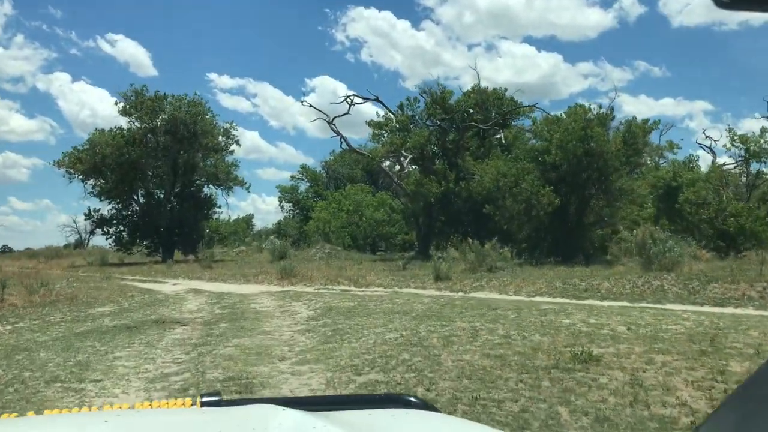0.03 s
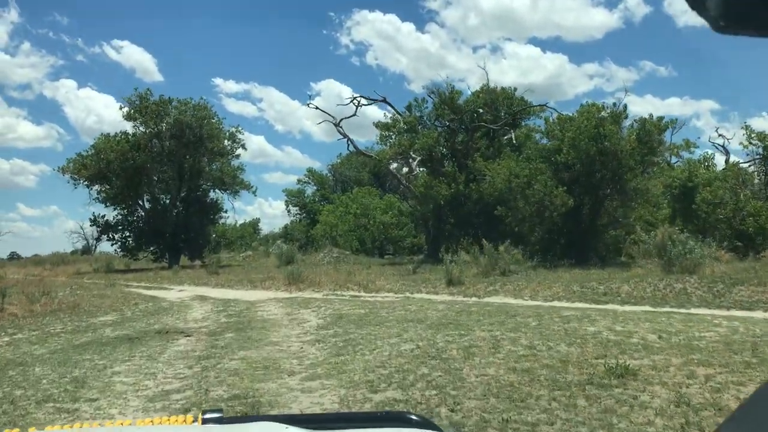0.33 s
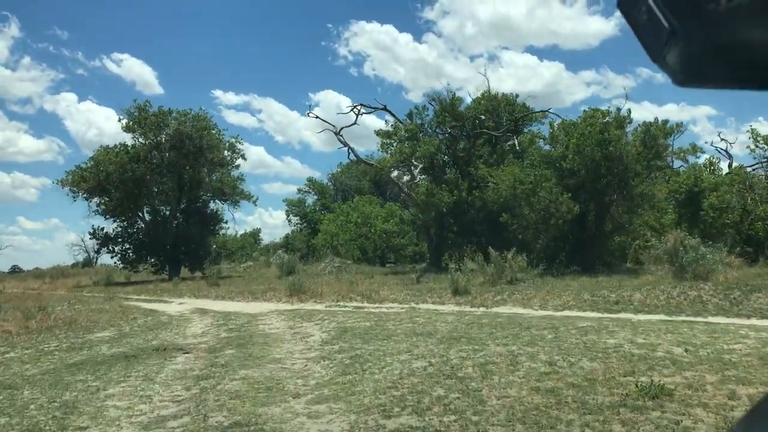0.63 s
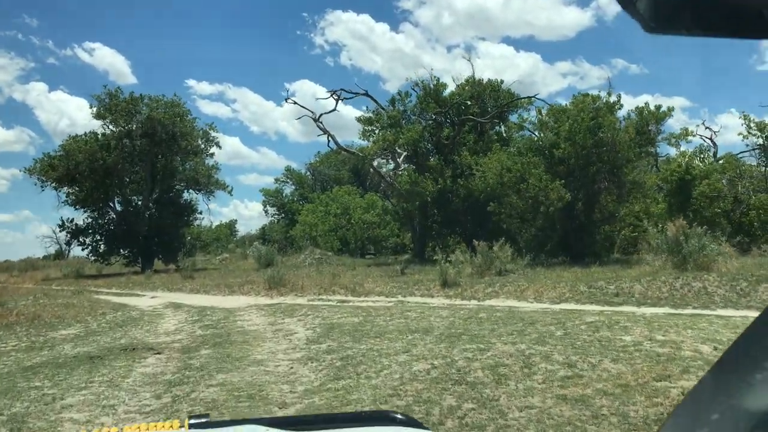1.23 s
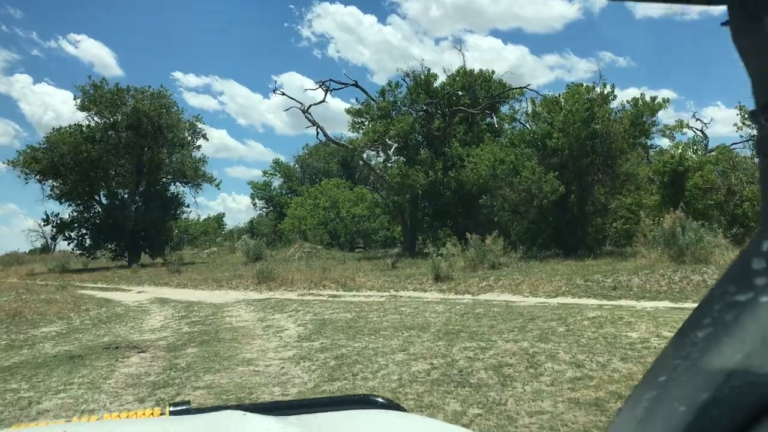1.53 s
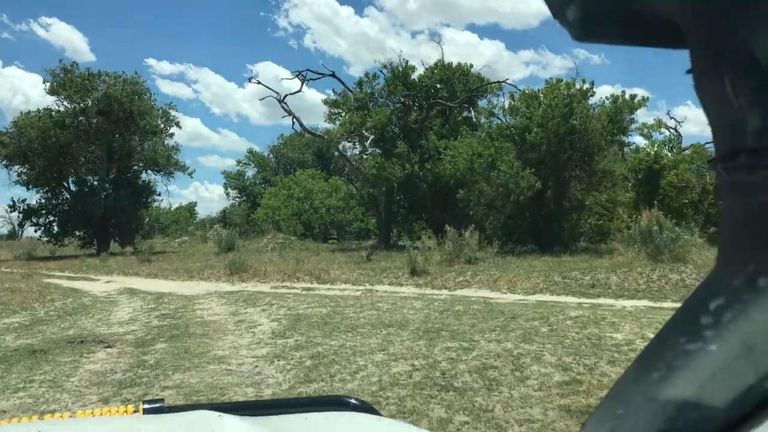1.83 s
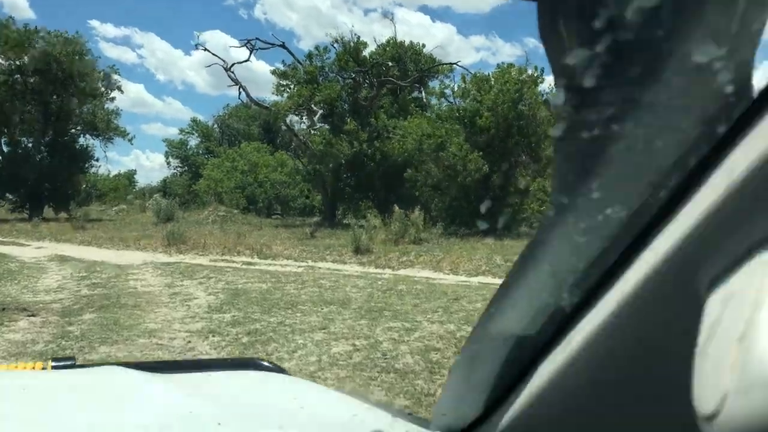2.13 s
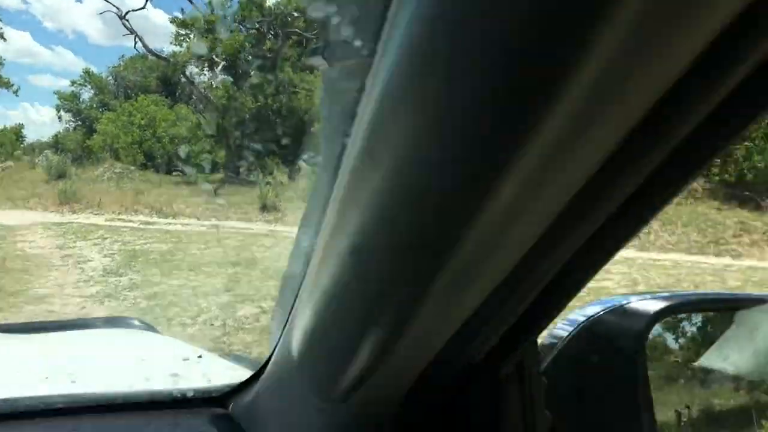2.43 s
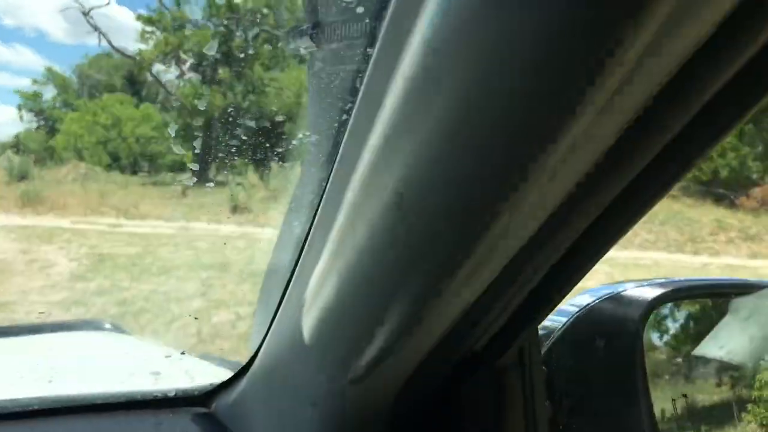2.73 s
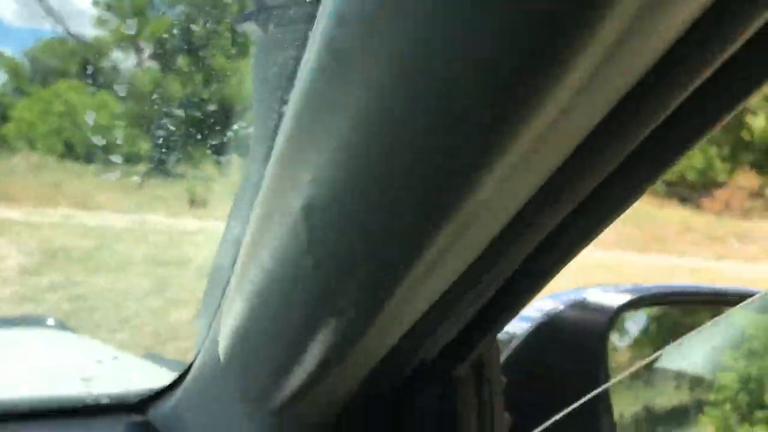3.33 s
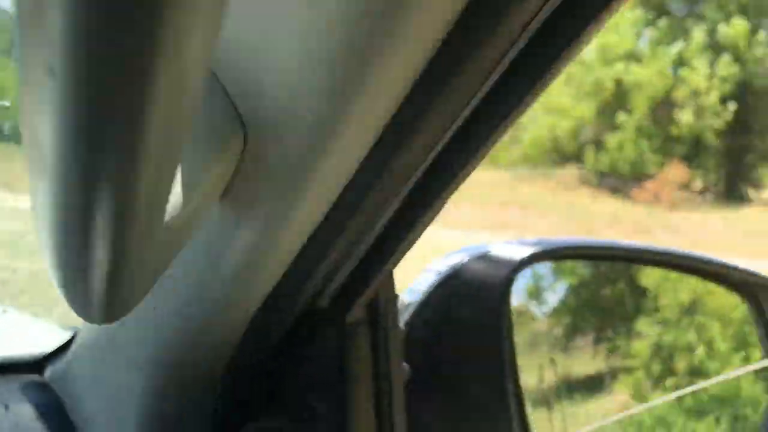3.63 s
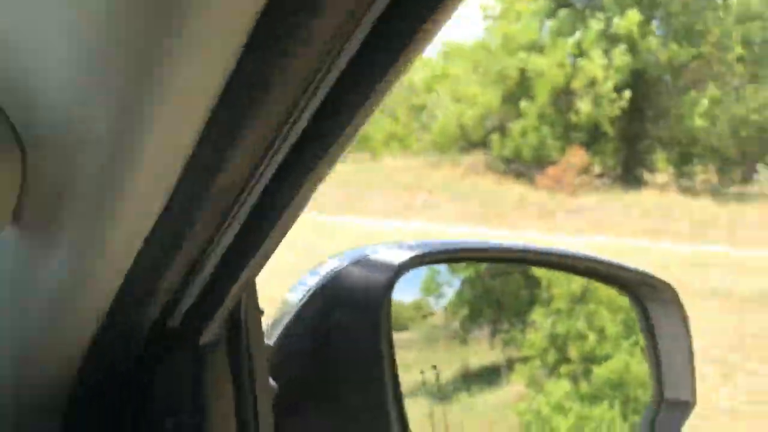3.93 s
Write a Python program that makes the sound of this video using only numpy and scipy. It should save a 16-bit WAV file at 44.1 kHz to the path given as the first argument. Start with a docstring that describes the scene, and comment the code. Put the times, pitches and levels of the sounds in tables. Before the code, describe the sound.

A vehicle's engine rumbles down to idle, then a power window clunks and slides open.

```python
"""Inside an off-road vehicle, the engine runs down to idle while loose plastic trim ticks and squeaks
and the cabin booms. Someone shifts in a seat, clothing brushing it, and bumps the door: a hard fitting
rings, then the panels hum briefly. At three seconds an electric window breaks free of its seal with a
clunk; its motor whirrs and the glass hisses down through the rubber."""
import sys
import numpy as np
from scipy import signal
from scipy.fft import rfft, irfft
from scipy.io import wavfile

SR = 44100
rng = np.random.default_rng(int(sys.argv[2]) if len(sys.argv) > 2 else 0)


def store_pcm(level_fs):
    """Save levels as 16-bit WAV."""
    pcm = np.round(np.clip(level_fs, -1, 1) * 32767).astype(np.int16)
    wavfile.write(sys.argv[1], SR, np.atleast_2d(pcm).T)


N = 176400
T = np.arange(N) / SR

# engine run-down: (time [s], firing rate [Hz], level of each of harmonics 1 to 4 [dB])
ENGINE_RUNDOWN = [(0.0, 59.77, -40.5, -37.5, -37, -55), (0.09, 59.74, -32, -41.5, -39, -50.5),
                  (0.18, 60.06, -55, -37.5, -44.5, -62), (0.47, 57.32, -30, -38.5, -40.5, -54),
                  (0.6, 57.1, -35, -38, -46, -64), (0.68, 54.54, -32, -38, -46.5, -54),
                  (0.75, 52.74, -30.5, -47, -64, -73), (0.87, 49.56, -34.5, -56, -44.5, -60),
                  (0.97, 46.8, -28.5, -36, -41.5, -38.5), (1.11, 43.36, -39.5, -41.5, -43.5, -46.5),
                  (1.22, 40.2, -40, -37, -65, -46), (1.28, 39.76, -34.5, -62, -43.5, -53.5),
                  (1.36, 37.85, -42, -37, -47, -48.5), (1.49, 34.79, -35.5, -37.5, -55, -47),
                  (1.63, 31.06, -45, -49.5, -45, -49.5), (1.89, 26.25, -63, -39.5, -47, -45.5),
                  (2.1, 25.13, -53, -43, -48.5, -62.5), (2.32, 24.56, -54, -60, -41, -55),
                  (2.54, 23.37, -56, -47, -47.5, -55), (2.95, 23.25, -61, -45, -46, -54),
                  (3.27, 23.95, -60, -44, -42.5, -44), (3.5, 24.4, -60, -49, -45.5, -45.5),
                  (3.7, 24.45, -62, -53, -47, -50), (4.0, 24.37, -54, -73, -45, -51.5)]
# cabin response to the higher harmonics: (frequency [Hz], level [dB])
CABIN_RESPONSE = [(90, -56), (120, -58.5), (150, -60.5), (183, -54), (215, -78.5), (300, -68), (360, -84),
                  (450, -74.5), (700, -83.5)]
# fade of the engine and tyre rumble: (time [s], level [dB])
RUMBLE_FADE = [(0, -40), (.45, -41.5), (.75, -44.5), (1.05, -45), (1.3, -46.5), (1.9, -45.5), (2.3, -48.5),
               (2.75, -49.5), (3.4, -49), (4, -55.5)]
# colour of the rumble: (frequency [Hz], gain [dB])
RUMBLE_EQ = [(20, 0.5), (42, 20.5), (90, 7.5), (180, 5.5), (225, -2), (330, -9.5), (450, -12.5), (600, -14),
             (850, -40.5), (1400, -31), (2200, -35), (4000, -39.5), (8000, -55), (15000, -72)]
# panels and cabin air rung by the rumble: (frequency [Hz], width [Hz], level against the rumble [dB])
CABIN_MODES = [(188, 5.3, -9), (290.2, 28, -15), (351.6, 21.7, -18), (634, 105, -22.5), (1160, 145, -28.5),
               (1502, 79, -30), (1855, 10, -37)]
# colour of the faint air bed: (frequency [Hz], gain [dB])
AIR_EQ = [(500, -5), (5000, 5), (9000, 0.5), (10400, -4.5), (12000, 2), (16000, -2)]
# ticks of loose trim: (time [s], level [dB], pitch [Hz])
TRIM_TICKS = [(0.014, -59, 2860), (0.397, -64, 2840), (0.53, -72.5, 8500), (.612, -72, 5980),
              (.688, -68, 3160), (.833, -73, 12980), (0.894, -54.5, 1268), (0.922, -65, 5000),
              (0.989, -66, 6960), (1.019, -59.5, 1280), (1.5417, -56.5, 1470), (1.541, -67, 4180),
              (1.567, -59, 2416), (2.161, -60, 2067), (2.9, -55, 1000), (2.899, -63, 3200),
              (2.897, -62, 6500), (2.943, -65, 3250)]
# squeaks of plastic trim: (time [s], level [dB], pitch [Hz])
TRIM_SQUEAKS = [(0.079, -64.5, 6300), (0.169, -69, 6300), (0.239, -65.5, 6270), (.262, -70, 6200),
                (0.297, -66, 6400), (.314, -69, 6300), (0.328, -61, 6200), (.398, -57.5, 6050),
                (0.417, -62, 6240), (0.99, -57, 2746), (1.19, -66.5, 4500), (1.97, -74, 4600),
                (2.025, -68.5, 4400)]
# deep booms in the cabin: (time [s], level [dB], pitch [Hz])
CABIN_BOOMS = [(0.648, -22, 55.3), (3.049, -27.5, 82.3), (3.103, -24, 61.5), (3.133, -25, 67.8),
               (3.39, -29, 58.03)]
# clothing brushing the seat: (peak time [s], level [dB], half length [s])
SEAT_BRUSHES = [(1.635, -61.5, 0.03), (1.824, -63.5, 0.028), (1.856, -58.5, 0.011), (2.017, -71.5, 0.022),
                (2.234, -65, 0.013), (2.4, -75, 0.088), (2.728, -70, 0.061), (2.871, -71, 0.047)]
# colour of the cloth: (frequency [Hz], gain [dB])
CLOTH_EQ = [(500, -6), (1400, 15.5), (3500, 9.5), (5800, 10.5), (9500, 10.5), (10500, 7.5), (13000, 8.5),
            (16000, 3)]
# knocks of door, latch and glass: (time [s], thud gain [dB], clack [dB], crack [dB], contact decay [s])
DOOR_KNOCKS = [(1.8432, -41, -43, -55, 0.0095), (1.85, -31, -40.5, -49.5, 0.013),
               (1.876, -35.5, -62, -77, 0.0051), (1.906, -49, -53.5, -66, 0.011),
               (3.014, -54, -50, -53, 0.0086), (3.0195, -43, -38, -40.5, 0.0083),
               (3.026, -30.5, -34, -44.5, 0.0076), (3.041, -44, -44, -45, 0.0061),
               (3.052, -40, -40, -38.5, 0.0087), (3.067, -41, -32.5, -39, 0.0073),
               (3.0759, -31.5, -30, -49, 0.013), (3.092, -44, -54, -35.5, 0.011),
               (3.098, -39.5, -50, -35, 0.016), (3.112, -30, -39, -32.5, 0.01),
               (3.12, -37.5, -40.5, -24.5, 0.0061), (3.126, -37.5, -41, -40, 0.0063),
               (3.144, -30.5, -47, -59, 0.014), (3.174, -40.5, -48.5, -57, 0.019),
               (3.392, -45, -48, -56, 0.051)]
# thud of the door panel: (frequency [Hz], gain [dB])
PANEL_MODES = [(80, 7), (110, -1), (138, 9.5), (178, 4.5), (255, 0.5), (304, 0), (385, -11.5), (480, -7.5)]
# clack of the window frame and lifter: (frequency [Hz], width [Hz], gain [dB])
FRAME_MODES = [(333.1, 46, 6.5), (557, 85, 3.5), (702, 108, 1.5), (1090, 204, 0.5), (1455, 147, 2.5),
               (1917.4, 280, -4), (2370, 775, -5.5), (2888, 230, -5)]
# crack of the glass in its seal: (frequency [Hz], width [Hz], gain [dB])
SEATED_GLASS_MODES = [(2800, 1400, 1), (3750, 345, 8.5), (4250, 290, 4.5), (5570, 540, 5),
                      (6770, 1400, -4.5), (8828, 1500, -6.5), (12600, 2700, -14)]
# bumps on a hard door fitting: (time [s], level [dB])
FITTING_BUMPS = [(1.8444, -42.5), (1.853, -48.5)]
# ring of the fitting: (frequency [Hz], gain [dB], time to fall 60 dB [s])
FITTING_RING = [(1040, -16, 0.13), (1363, -2, 0.046), (1780, 0.5, 0.046), (2300, -10.5, 0.062),
                (3505, -11, 0.054), (4294, -0.5, 0.027)]
# spin-up of the window motor: (time [s], speed [turns/s])
MOTOR_SPIN = [(3.02, 105), (3.08, 120), (3.25, 120.7), (3.32, 121.2), (3.42, 120.7), (3.55, 121.3),
              (4, 121.2)]
# tones of the motor: (multiple of the turning rate, level [dB])
MOTOR_HARMONICS = [(1, -54), (2, -63), (3, -69.5), (4, -65), (5, -72), (6, -69.5), (7, -74), (8, -73.5),
                   (12, -72), (30, -62.5)]
# glass rubbing on the seal: (time [s], body level [dB], treble level [dB])
SLIDE_LEVELS = [(3.05, -52, -57), (3.17, -61.5, -59), (3.22, -55.5, -59), (3.35, -55.5, -57),
                (3.42, -51, -57), (3.5, -49.5, -55.5), (3.59, -48, -52), (3.7, -50.5, -55.5),
                (3.82, -48, -55.5), (3.94, -49, -57), (4, -48, -54)]
# colour of the slide's body: (frequency [Hz], gain [dB])
SLIDE_BODY_EQ = [(200, 20.5), (520, 14.5), (800, 10.5), (1450, 9.5), (2150, 7), (2460, 6.5), (2950, 3.5),
                 (3650, 8.5), (4450, 9.5), (4950, 2.5), (6500, 5), (9000, -5), (15000, 2.5)]
# colour of the slide's treble: (frequency [Hz], gain [dB])
SLIDE_TREBLE_EQ = [(2000, 14.5), (5000, 2), (6800, 9), (7600, 9), (8900, 14), (9500, 10.5), (10000, 11.5),
                   (10600, 6), (12000, 9.5), (16000, -4)]
# pane rung by the rubber: (frequency [Hz], width [Hz], level against the slide's body [dB])
PANE_RING = [(2440, 61.6, -27), (3510, 89, -19), (4420, 150, -18), (5420, 99, -16), (6500, 330, -24),
             (8000, 200, -30), (8800, 100, -26)]
# brief rubs on the seal: (peak time [s], level [dB], half length [s], pitch [Hz], width [Hz])
SEAL_RUBS = [(3.555, -56, .05, 2440, 200), (3.87, -56.5, 0.069, 3860, 900)]

CONTACT_RISE_S, PANEL_T60_S = 0.0013, 0.12
MOTOR_ON_S, MOTOR_RISE_S = 3.02, 0.083


def from_db(db):
    """Decibels to gain."""
    return 10 ** (np.asarray(db) / 20)


def rms_one(x):
    """Scale to unit power."""
    return x / np.sqrt(np.mean(x ** 2) + 1e-20)


def in_time(rows):
    """Each column of an automation curve, at every sample."""
    times, *columns = np.transpose(rows)
    return [np.interp(T, times, column) for column in columns]


def at_hz(eq, hz):
    """Read an EQ curve in dB on a log-frequency axis."""
    freqs, db = np.transpose(eq)
    return np.interp(np.log(np.maximum(hz, 1)), np.log(freqs), db)


def drift(rate_hz, size=4410):
    """Smooth random wander of spread 1."""
    freqs = np.arange(size // 2 + 1) * SR / N
    spectrum = rfft(rng.standard_normal(size)) / (1 + (freqs / rate_hz) ** 2)
    return np.interp(np.arange(N) * size / N, np.arange(size), rms_one(irfft(spectrum, size)))


def noise(eq):
    """Noise of the given colour, rms 1."""
    freqs = np.arange(N // 2 + 1) * SR / N
    return rms_one(irfft(rfft(rng.standard_normal(N)) * from_db(at_hz(eq, freqs)), N))


def burst(start, rise_s, decay_s):
    """Fast attack and exponential tail, peak 1."""
    age = np.maximum(T - start, 0)
    shape = (1 - np.exp(-(age / rise_s) ** 2)) * np.exp(-np.minimum(age / decay_s, 60))
    return shape / shape.max()


def swell(peak_s, db, half_s):
    """A rounded rise and fall."""
    return from_db(db) / (1 + ((T - peak_s) / half_s) ** 4)


def rattle(force, modes):
    """A rough contact drives parallel resonances; force 1 gives rms 1."""
    drive = force * rng.standard_normal(N) + 1e-18
    out, power = 0, 0
    for k, (hz, width, db) in enumerate(modes):
        radius, gain = np.exp(-np.pi * width / SR), from_db(db)
        feed = (1 - radius ** 2) / 2
        poles = [1, -2 * radius * np.cos(2 * np.pi * hz / SR), radius ** 2]
        out += (-1) ** k * gain * signal.lfilter([feed, 0, -feed], poles, drive)
        power += feed * gain ** 2
    return out / np.sqrt(power)


def band(force, hz, width_hz):
    """Noise ringing through a single resonance."""
    return rattle(force, [(hz, width_hz, 0)])


def engine():
    """Firing harmonics slide down through the cabin's resonances, over a rumble that throbs with them."""
    firing_hz, *low_db = in_time(ENGINE_RUNDOWN)
    rumble_db, = in_time(RUMBLE_FADE)
    phase = 2 * np.pi * np.cumsum(firing_hz) / SR
    load_db = rumble_db - rumble_db.mean()
    tone = 0
    for k in range(1, 19):
        if k <= len(low_db):
            db = low_db[k - 1]
        else:  # upper harmonics ride the rumble's level and waver by 3 dB
            db = at_hz(CABIN_RESPONSE, k * firing_hz) + load_db + 3 * drift(10.4)
        tone += np.sqrt(2) * from_db(db) * np.cos(k * (phase + rng.normal(0, 0.2)))
    rumble = noise(RUMBLE_EQ) + sum(band(from_db(db), hz, width) for hz, width, db in CABIN_MODES)
    throb = 1 + 0.19 * np.cos(phase)
    return tone + from_db(rumble_db) * rumble * throb


def air():
    """A faint, steady bed of hiss."""
    return from_db(-77.5) * noise(AIR_EQ)


def trim():
    """Loose plastic ticks with a broad resonance and squeaks with a narrow one."""
    ticks = sum(band(from_db(db) * burst(start, rise_s=0.0012, decay_s=0.012), hz, 0.26 * hz)
                for start, db, hz in TRIM_TICKS)
    squeaks = sum(band(from_db(db) * burst(start, CONTACT_RISE_S, decay_s=0.003), hz, 0.07 * hz)
                  for start, db, hz in TRIM_SQUEAKS)
    return ticks + squeaks


def booms():
    """Deep booms in the cabin, a few cycles each, including the low thud of the window's clunk."""
    return sum(from_db(db) * burst(start, rise_s=0.01, decay_s=0.028)
               * np.sin(2 * np.pi * hz * (T - start)) for start, db, hz in CABIN_BOOMS)


def clothing():
    """Cloth brushes the seat in soft, bright swishes."""
    return noise(CLOTH_EQ) * sum(swell(*brush) for brush in SEAT_BRUSHES)


def door():
    """Each knock thumps the panel, rattles the frame and cracks against the glass."""
    thuds, clack, crack = 0, 0, 0
    for start, thud_db, clack_db, crack_db, decay_s in DOOR_KNOCKS:
        contact = burst(start, CONTACT_RISE_S, decay_s)
        clack += from_db(clack_db) * contact
        crack += from_db(crack_db) * contact
        age = np.maximum(T - start, 0)
        panel = sum(from_db(db + rng.normal(0, 2)) * np.sin(2 * np.pi * hz * age)
                    for hz, db in PANEL_MODES)
        thuds += from_db(thud_db - 60 * age / PANEL_T60_S) * panel / 2
    return thuds + rattle(clack, FRAME_MODES) + rattle(crack, SEATED_GLASS_MODES)


def fitting():
    """A hard fitting on the door rings as it is bumped, each mode with a strength of its own."""
    ring = 0
    for start, db in FITTING_BUMPS:
        age = np.maximum(T - start, 0)
        for hz, mode_db, t60 in FITTING_RING:
            strike_db = db + mode_db + rng.normal(0, 2.06)
            ring += from_db(strike_db - 60 * age / t60) * np.sin(2 * np.pi * hz * age)
    return ring


def panel_hum(hz=356):
    """The panels hum softly for a moment as the engine settles."""
    return swell(peak_s=2.03, db=-56, half_s=0.095) * np.sin(2 * np.pi * hz * T)


def window_motor(shaft_phase, waver_db=2.5):
    """The motor hums and whines on multiples of its turning rate."""
    return sum(np.sqrt(2) * from_db(db + waver_db * drift(6.16))
               * np.sin(k * shaft_phase + 2 * np.pi * rng.random()) for k, db in MOTOR_HARMONICS)


def seal_scratches(count=30, low_hz=2400, high_hz=9200, wander_db=6):
    """The rubber sticks and slips: narrow resonances come and go across the treble; rms 1."""
    pitches = low_hz + (high_hz - low_hz) * (np.arange(count) + rng.random(count)) / count
    scratches = 0
    for hz in pitches:
        db = at_hz(SLIDE_BODY_EQ, hz) + wander_db * np.tanh(drift(7))
        scratches += band(from_db(db), hz, width_hz=80)
    return rms_one(scratches)


def sliding_glass(shaft_phase):
    """The pane hisses and rings against the rubber, rippled by the drive twice a turn."""
    body_db, treble_db = in_time(SLIDE_LEVELS)
    body = rms_one(noise(SLIDE_BODY_EQ) + from_db(2) * seal_scratches())
    hiss = from_db(body_db) * body + from_db(treble_db) * noise(SLIDE_TREBLE_EQ)
    pane = sum(band(from_db(body_db + db + 2.5 * drift(21)), hz, width) for hz, width, db in PANE_RING)
    rubs = sum(band(swell(peak, db, half), hz, width) for peak, db, half, hz, width in SEAL_RUBS)
    grain = from_db(0.44 * drift(250))
    ripple = 1 + 0.054 * np.cos(2 * shaft_phase)
    return (hiss + pane + rubs) * grain * ripple


def window():
    """The motor spins up with a slight wobble and draws the glass down."""
    speed, = in_time(MOTOR_SPIN)
    wobble = 1 + 0.00303 * drift(58)
    shaft_phase = 2 * np.pi * np.cumsum(speed * wobble) / SR
    fade_in = np.clip((T - MOTOR_ON_S) / MOTOR_RISE_S, 0, 1)
    return fade_in * (window_motor(shaft_phase) + sliding_glass(shaft_phase))


def scene():
    """The mono mix, as heard from the front seat."""
    mix = engine() + panel_hum() + booms() + door() + fitting() + trim() + clothing() + window() + air()
    return mix[None]


def record(dry, low_cut_hz=40, high_cut_hz=15750):
    """The microphone loses the deepest bass; the top is cut steeply."""
    thinned = signal.sosfilt(signal.butter(2, low_cut_hz, "high", fs=SR, output="sos"), dry)
    return signal.sosfiltfilt(signal.ellip(10, .05, 60, high_cut_hz, fs=SR, output="sos"), thinned)


dry = scene()
out = record(dry)
store_pcm(out)
```